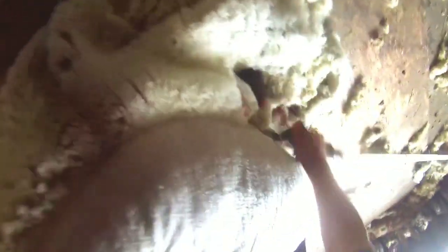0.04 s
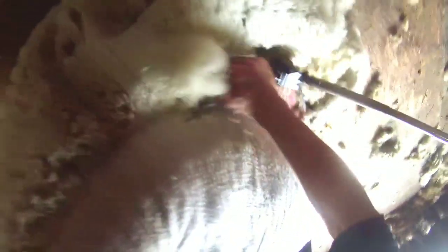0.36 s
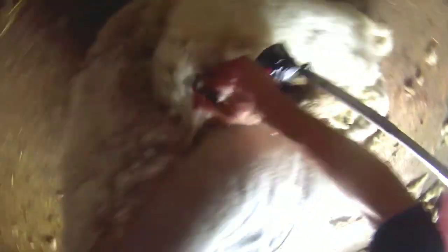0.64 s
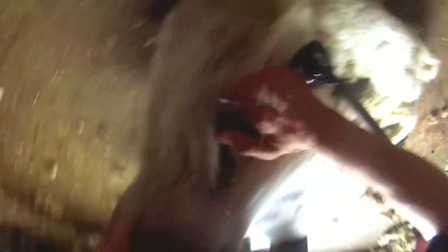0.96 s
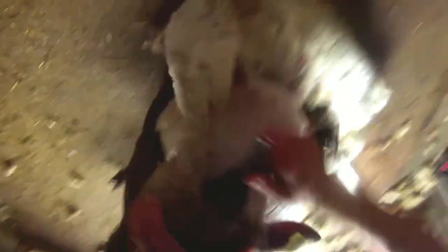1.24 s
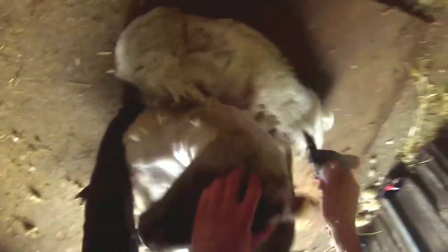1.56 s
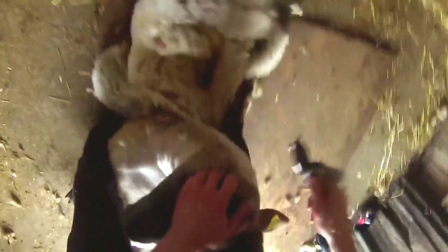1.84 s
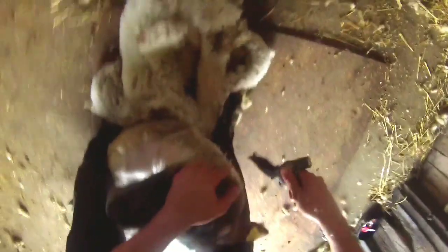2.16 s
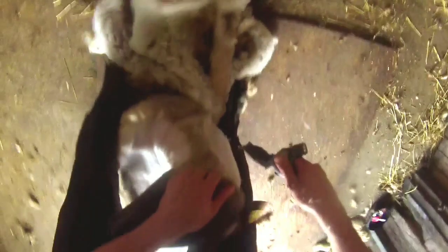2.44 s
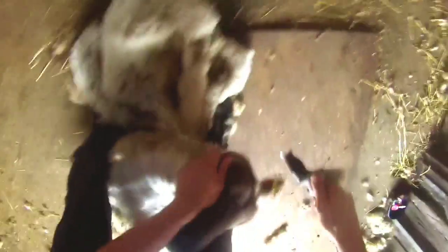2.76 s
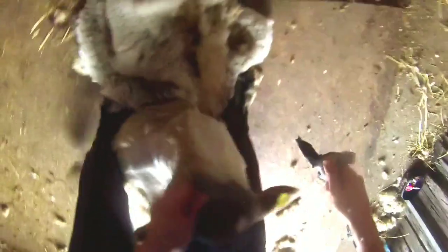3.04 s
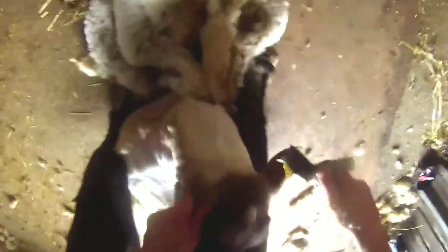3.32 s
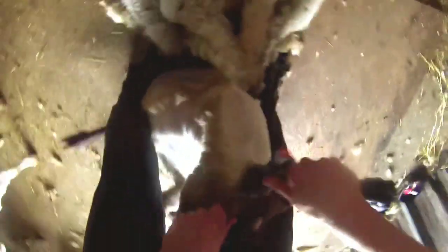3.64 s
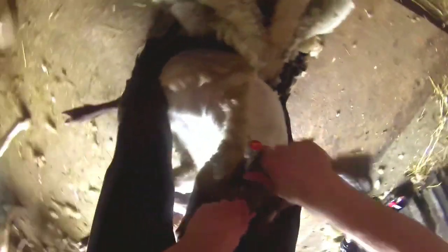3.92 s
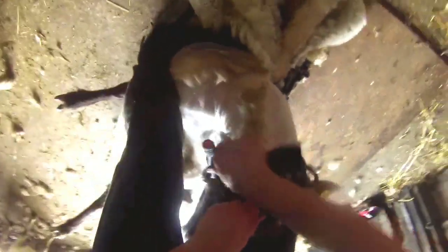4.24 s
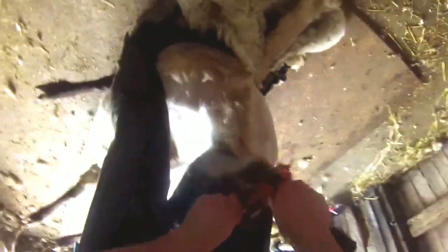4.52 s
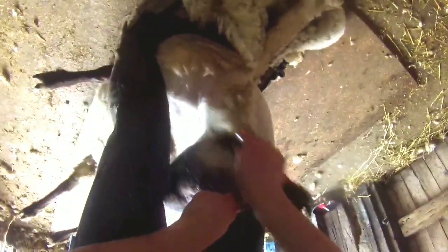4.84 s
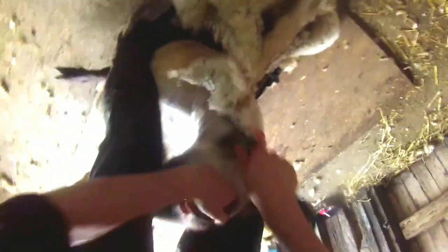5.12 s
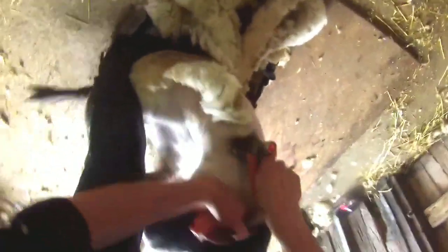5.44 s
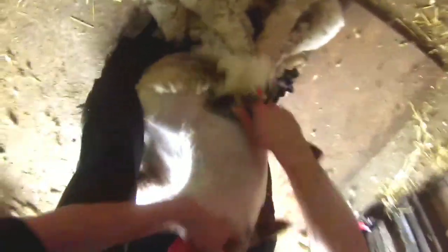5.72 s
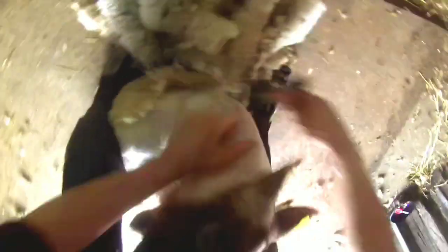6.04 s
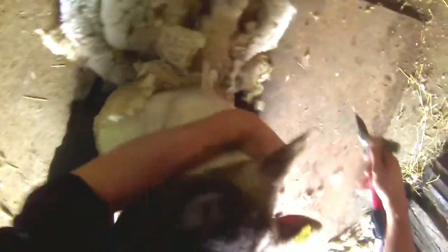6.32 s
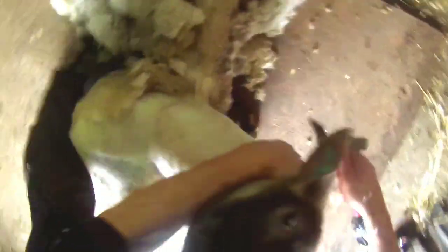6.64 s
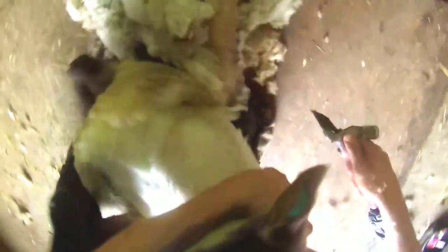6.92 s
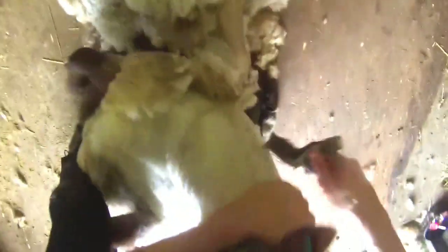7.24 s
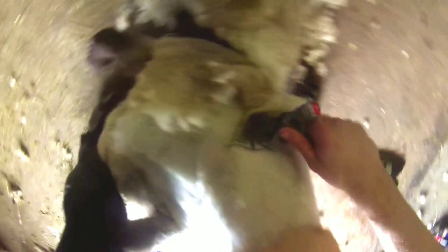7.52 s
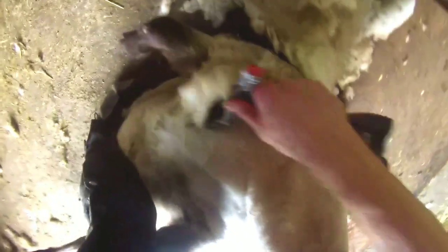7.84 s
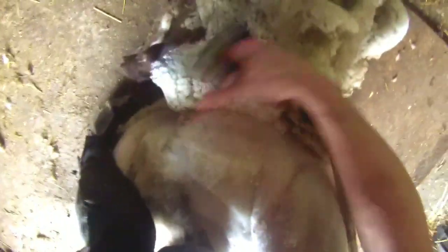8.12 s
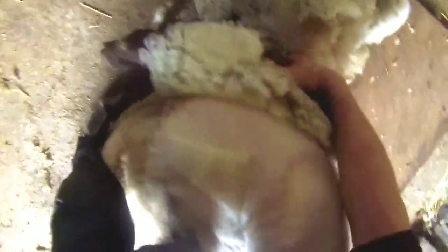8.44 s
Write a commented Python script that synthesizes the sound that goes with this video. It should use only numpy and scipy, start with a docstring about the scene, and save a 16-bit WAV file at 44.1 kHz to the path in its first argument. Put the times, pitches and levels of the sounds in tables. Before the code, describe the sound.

An electric shearing handpiece buzzes and rattles steadily through a sheep's fleece in a barn, with dull bumps on the microphone.

```python
"""A shaft-driven shearing handpiece buzzes through a sheep's fleece in a barn, about 58 strokes a second.
Fork knocks and cutter friction ring the steel, brighter or duller as it meets wool; the drive hums.
The shearer's movements rumble and bump on a body-worn microphone throughout.
Near 1 s an animal calls once, far off. At 2.3 s the sound cuts out for a moment.
Near 7 s the shaft sags and the gear whine peaks; from 7.5 s the shearer moves hardest."""
import sys
import numpy as np
from scipy import signal
from scipy.fft import rfft, irfft, next_fast_len
from scipy.io import wavfile
from scipy.ndimage import uniform_filter1d, map_coordinates

SR = 44100
rng = np.random.default_rng(int(sys.argv[2]) if len(sys.argv) > 2 else 0)


def generate_wav(signal):
    """Clip the signal to [-1, 1] and save it as 16-bit WAV at the path in sys.argv[1]."""
    frames = np.transpose(np.atleast_2d(signal))
    scaled = np.clip(frames, -1, 1) * 32767
    pcm = np.round(scaled).astype(np.int16)
    wavfile.write(sys.argv[1], SR, pcm)


N = 382347
TIME_S = np.arange(N) / SR


def amp(db):
    """Decibels to gain."""
    return 10 ** (np.asarray(db) / 20)


def unit(x):
    """Scale to rms 1."""
    return x / np.sqrt(np.mean(x ** 2) + 1e-20)


def along(points, hz):
    """(Hz, value) points read on a log axis."""
    point_hz, values = np.transpose(points)
    return np.interp(np.log(np.maximum(hz, 1)), np.log(point_hz), values)


def curve(points):
    """(seconds, value) points read at every sample."""
    return np.interp(TIME_S, *np.transpose(points))


def spells(rows, ramp_s):
    """(start s, end s, value, ..) rows as one curve per value column: rise, hold, fall."""
    rows = np.array(rows)
    gates = [np.clip(.5 + np.minimum(TIME_S - start_s, end_s - TIME_S) / ramp_s, 0, 1)
             for start_s, end_s in rows[:, :2]]
    return rows[:, 2:].T @ np.array(gates)


def wobble(knots_per_s, at_s=TIME_S):
    """Smooth random curve."""
    return map_coordinates(rng.standard_normal(512), [at_s * knots_per_s], mode="mirror")


def filtered(x, response):
    """x through a response given as a function of Hz."""
    size = next_fast_len(N + SR // 4, True)
    return irfft(rfft(x, size) * response(np.fft.rfftfreq(size, 1 / SR)), size)[:N]


def noise(spectrum):
    """Noise shaped by (Hz, dB) points, at rms 1."""
    return unit(filtered(rng.standard_normal(N), lambda hz: amp(along(spectrum, hz))))


def pulses(times_s, sizes):
    """Sharp impulses placed between samples."""
    taps = np.floor(times_s * SR)[:, None] + np.arange(-7, 9)
    offset = taps - times_s[:, None] * SR
    shapes = sizes[:, None] * np.sinc(offset) * np.cos(np.pi * offset / 16) ** 2
    return np.bincount(np.clip(taps, 0, N).astype(int).ravel(), shapes.ravel(), N + 1)[:N]


def wash():
    """Diffuse noise of the machine in the barn."""
    # Each row: frequency in Hz, relative density in dB.
    spectrum = [(200, -18), (500, 1), (900, 2), (2000, -0.5), (6000, -0.5), (10000, -8.5), (16000, -17)]
    return amp(-64) * noise(spectrum)


def barn(x, wet_db):
    """Floor and walls answer, treble dying first; the answer changes as the handpiece travels."""
    # Each row: frequency in Hz, t60 in seconds.
    decay = [(200, 0.38), (2000, 0.2), (12000, 0.063)]
    hz, t, bins = signal.stft(rng.standard_normal((2, SR // 3)), SR, nperseg=256)
    tails = signal.istft(bins * amp(-60 * t / along(decay, hz)[:, None]), SR, nperseg=256)[1]
    here, there = [signal.fftconvolve(x, tail / np.linalg.norm(tail))[:N] for tail in tails]
    travel_rad = 2 * np.pi * .6 * TIME_S
    return unit(x + amp(wet_db) * (np.cos(travel_rad) * here + np.sin(travel_rad) * there))


def far_animal(waver_db):
    """One call slides up, swells and fades; only harmonics near the throat's resonance carry."""
    # Each row: harmonic number, relative level in dB.
    throat = [(3, 2), (4, 18.5), (5, 2.5)]
    start_s, peak_s, end_s = .82, 1.056, 1.5
    from_hz, to_hz, glide_s = 173, 188, .088
    swell_db_per_s, fade_db_per_s = 29, 46
    pitch_hz = to_hz + (from_hz - to_hz) * np.exp(-np.maximum(TIME_S - start_s, 0) / glide_s)
    phase = 2 * np.pi * np.cumsum(pitch_hz) / SR
    voice = unit(sum(amp(db) * np.sin(harmonic * phase) for harmonic, db in throat))
    level_db = -59 - np.maximum(swell_db_per_s * (peak_s - TIME_S), fade_db_per_s * (TIME_S - peak_s))
    gate, = spells([(start_s, end_s, 1)], ramp_s=.04)
    return voice * gate * amp(level_db + waver_db * wobble(34.7))


def movement(gust_db, crunch_db):
    """Air buffets the microphone and clothing rubs beside it, both more when the shearer shifts."""
    # Each row: start in seconds, end in seconds, air boost in dB, rub boost in dB.
    moves = [(.5, 1.8, 6, 0.5), (1.3, 1.44, 1.5, 1.5), (2.1, 2.6, 6.5, 4.5), (4.45, 4.6, 3, 0.5),
             (4.65, 7.5, 2.5, 0), (5.3, 5.65, 7.5, 1), (7.53, 7.97, 10.5, 4), (8.03, 8.16, 15.5, 3),
             (8.23, 8.7, 10.5, 7.5), (8.5, 8.7, 1.5, 2)]
    # Each row: frequency in Hz, relative density in dB.
    air_spectrum = [(2, -25), (7, 4.5), (12, 3), (20, -5.5), (32, -13.5), (50, -21), (80, -31.5),
                    (140, -49.5), (400, -71), (1000, -120)]
    rub_spectrum = [(30, -39), (80, 3), (130, 2.5), (200, -0.5), (270, -1), (380, -4.5), (600, -10),
                    (1200, -12.5), (4000, -39.5)]
    air_db, rub_db = spells(moves, ramp_s=.06)
    unrest_db, folds_db = gust_db * wobble(5.9), crunch_db * wobble(45)
    air = amp(-45 + air_db + unrest_db) * noise(air_spectrum)
    rub = amp(-69.5 + rub_db + folds_db) * noise(rub_spectrum)
    return air + rub


def bumps(t60_s):
    """Each jolt of the microphone is a short, dull shudder."""
    # Each row: start in seconds, peak in dB before the common boost.
    jolts = [(0.524, -64), (0.601, -69), (0.812, -57.5), (1.209, -61), (1.406, -59), (1.662, -60),
             (1.792, -67), (2.186, -54.5), (5.474, -62), (5.585, -58), (5.609, -64), (5.835, -57),
             (7.579, -53.5), (7.648, -56), (7.769, -59.5), (8.104, -54.5), (8.27, -53), (8.431, -55.5),
             (8.57, -54)]
    # Each row: frequency in Hz, relative density in dB.
    spectrum = [(40, 4), (130, -8.5), (265, -0.5), (370, -14.5), (520, -19.5), (1200, -20), (4000, -52)]
    boost_db, attack_s = 10.5, .0004
    t, out = np.arange(SR // 5) / SR, np.zeros(N + SR)
    colour = amp(along(spectrum, np.fft.rfftfreq(len(t), 1 / SR)))
    envelope = amp(-60 * t / t60_s) * (1 - np.exp(-t / attack_s))
    for start_s, db in jolts:
        thud = irfft(rfft(rng.standard_normal(len(t))) * colour, len(t)) * envelope
        out[round(start_s * SR):][:len(t)] += amp(db + boost_db) * thud / np.abs(thud).max()
    return out[:N]


def shaft():
    """Turns made so far, plus a shudder of the joints that grows as the shaft is dragged slow."""
    # Each row: time in seconds, speed in turns a second.
    speeds = [(0, 58.1), (.43, 58.2), (.48, 57.6), (1.21, 58.3), (1.8, 58.1), (3.04, 57.5), (3.19, 58.0),
              (3.86, 57.6), (4.15, 58.2), (4.32, 57.7), (4.95, 58.2), (6.18, 58.3), (6.69, 57.6),
              (6.81, 56.5), (7.15, 57.15), (7.21, 57.85), (8.1, 58.15), (8.67, 57.7)]
    speed_hz, easy_hz = curve(speeds), 57.8
    shudder_turns = .0023 + .0114 * np.maximum(easy_hz - speed_hz, 0)
    coarse_s = np.linspace(0, N / SR, 2000)
    shake = np.interp(TIME_S, coarse_s, wobble(45, coarse_s))
    return np.cumsum(speed_hz) / SR + shudder_turns * shake


def drive(turns, waver_db):
    """The unbalanced shaft hums; its gears whine on higher orders that waver as the arm swings."""
    # Each row: start in seconds, end in seconds, boost in dB.
    hum_swells = [(2.35, 3.13, 9.5), (3.35, 3.64, 8.5), (7.56, 8.24, 14.5)]
    # Each row: shaft order, relative level in dB.
    gears = [(11, -11), (12, -15), (13, -2.5), (14, 0), (15, -9), (16, -1), (17, -8), (18, -4), (19, -11),
             (20, -13), (21, -9)]
    # Each row: time in seconds, level in dB.
    whine_levels = [(0, -71), (2, -73.5), (3.3, -75.5), (4.1, -73), (6.5, -70.3), (7.2, -65.5),
                    (8.67, -71.5)]
    hum_db = -66.5 + spells(hum_swells, ramp_s=.055)[0]
    coarse_s, whine = np.linspace(0, N / SR, 200), np.zeros(N)
    for order, db in gears:
        sway_db = waver_db * np.interp(TIME_S, coarse_s, wobble(2.344, coarse_s))
        whine += amp(db + sway_db) * np.sin(2 * np.pi * (order * turns + rng.random()))
    return amp(hum_db) * unit(np.sin(2 * np.pi * turns)) + amp(curve(whine_levels)) * unit(whine)


def clatter(turns, drift_turns, jitter_s, scatter_db, sway_db):
    """The loose fork knocks several times a turn; each knock shifts and swells with the grip."""
    # Each row: place as a share of the turn, relative level in dB.
    contacts = [(.04, -5.5), (0.151, -10), (.29, -5), (0.432, -3.5), (0.551, -16.5), (0.682, -12.5),
                (0.829, -13)]
    whole_turns, knocks = np.arange(int(turns[-1]) - 1), np.zeros(N)
    starts_s = np.interp(whole_turns, turns, TIME_S)
    for place, db in contacts:
        jitter, scatter = rng.standard_normal((600, 2))[:len(whole_turns)].T
        at_turns = whole_turns + place + drift_turns * wobble(2.5, starts_s)
        times_s = np.interp(at_turns, turns, TIME_S) + jitter_s * jitter
        knocks += pulses(times_s, amp(db + sway_db * wobble(4, starts_s) + scatter_db * scatter))
    return unit(knocks)


def scrape(turns, stroke_bite, tooth_bite, lean, grit_db):
    """Strength of gritty friction: it jumps and fades at each cutter reversal and each tooth crossed."""
    def bursts(per_turn):
        return np.exp(-4 * (per_turn * turns % 1))
    reversals = stroke_bite * bursts(per_turn=2) * (1 + lean * np.cos(2 * np.pi * turns))
    crossings = tooth_bite * bursts(per_turn=8)
    grains = np.arange(0, N, 32)
    grit = np.interp(np.arange(N), grains, rng.standard_normal(len(grains)))
    return unit((1 + reversals + crossings) * amp(grit_db * grit))


def resonate(x, modes):
    """x through steep-sided resonances that hand and wool keep well damped, at rms 1."""
    def response(hz):
        power = 0
        for centre_hz, min_width_hz, db in modes:
            damping = (hz + 1) * max(min_width_hz, centre_hz / 9)
            detune = centre_hz ** 2 - hz ** 2
            power += (amp(db) * damping ** 2 / (detune ** 2 + damping ** 2)) ** 2
        lag = (damping + 1j * detune) / (damping - 1j * detune)  # all-pass at the last mode
        return np.sqrt(power) * lag
    return unit(filtered(x, response))


def zings(force):
    """Single resonances of the steel briefly come free and ring out."""
    # Each row: start in seconds, end in seconds, pitch in Hz, level in dB.
    rings = [(0.774, .87, 1630, -56), (1.563, 1.847, 1613, -59.5), (2.754, 2.928, 1640, -55.5),
             (2.77, 2.92, 2320, -56), (3.14, 3.62, 3190, -53.5), (3.907, 3.993, 1630, -54),
             (4.5, 4.68, 1680, -60.5), (5.706, 5.844, 6930, -56), (6.227, 6.536, 4270, -67),
             (6.6, 6.803, 1680, -56.5), (6.96, 7.04, 3500, -57), (7.07, 7.15, 980, -64),
             (7.495, 7.753, 2186, -54)]
    min_width_hz, out = 140, np.zeros(N)
    for start_s, end_s, hz, db in rings:
        gate, = spells([(start_s, end_s, 1)], ramp_s=.043)
        out += amp(db) * gate * resonate(force, [(hz, min_width_hz, 0)])
    return out


def ring_levels(flicker_db):
    """dB of housing, fork, comb, cutter, teeth, tips: load swells heavy parts, rubbing thin ones."""
    # Each row: time in seconds, level in dB.
    fork_levels = [(0, -50.5), (.35, -55.5), (1.1, -48.5), (2.0, -50), (2.65, -53.5), (3.15, -50.5),
                   (3.65, -54), (4.15, -49.5), (4.45, -55.5), (5.9, -52), (6.1, -55.5), (6.7, -51),
                   (7.15, -56), (8.67, -56)]
    comb_levels = [(0, -55), (.5, -57), (1.3, -56.3), (2.5, -53), (2.95, -56), (3.25, -55), (4.1, -53.5),
                   (4.65, -58), (4.9, -54), (5.3, -56.5), (6.2, -54), (6.42, -52), (7.0, -55.5),
                   (7.08, -61), (8.67, -63.5)]
    # Each row: start and end in seconds, then housing and fork gain in dB.
    loads = [(.52, 1.9, 3.5, -1), (1.36, 1.53, 4.5, -3), (2.05, 2.3, 6, 0), (3.8, 4.03, -1, 2),
             (3.91, 4.25, 2.5, -0.5), (4.53, 6.0, 2.5, 0.5), (6.25, 6.42, 4, -2), (6.6, 7.15, 1.4, -2),
             (7.5, 7.76, 3, -0.5), (8.08, 8.6, 3.5, 1)]
    # Each row: start and end in seconds, then cutter, teeth and tips gain in dB.
    sizzles = [(-.1, .2, 1, 3, 2.5), (.2, .5, 1, 3.5, 0), (1.3, 1.92, 2, 2.5, -0.5),
               (1.93, 2.14, 4.5, 3, 1.5), (3.66, 3.87, 1, -3, 3.5), (4.25, 4.7, 0.7, 0.5, 2.5),
               (4.82, 6.02, 1.5, 4.5, 0.2), (6.13, 7.04, 1, 4, 3.5), (6.8, 6.96, 4, 0, 0.5),
               (6.96, 7.03, 3, 3.5, 2.5), (7.12, 7.86, 2, .8, 1.3), (7.9, 8.2, 0, -3, 1.5),
               (8.42, 8.7, -1.5, -1.5, 0)]
    housing_load_db, fork_load_db = spells(loads, ramp_s=.071)
    cutter_rub_db, teeth_rub_db, tips_rub_db = spells(sizzles, ramp_s=.044)
    comb_db = curve(comb_levels)  # wool frees or damps the comb
    follow_db = .12 * (comb_db - comb_db.mean())
    grip_db = flicker_db * wobble(15)  # the hand damps the housing unevenly
    return (-59 + housing_load_db + grip_db, curve(fork_levels) + fork_load_db, comb_db,
            -59 + cutter_rub_db, -62 + follow_db + teeth_rub_db, -59.5 + tips_rub_db)


def tips_hiss(lower_force, upper_force, top_force):
    """The tooth tips hiss, crossfading between a lower and an upper ring, with fainter modes on top."""
    # Each row: centre in Hz, minimum width in Hz, relative level in dB.
    edge_modes = [(7800, 1500, 0), (9100, 1600, 0)]
    top_modes = [(11000, 3400, -1), (14600, 4500, -8.5)]
    # Each row: time in seconds, centre of the crossfade in Hz.
    centres = [(0, 7980), (3.5, 8000), (3.75, 8160), (4.1, 7970), (5.9, 7950), (6.5, 7960), (7.0, 7920),
               (7.45, 7630), (7.9, 8680), (8.67, 9000)]
    lower, upper = edge_modes
    upper_share = np.clip((curve(centres) - lower[0]) / (upper[0] - lower[0]), 0, 1)
    edge = np.sqrt(1 - upper_share) * resonate(lower_force, [lower])
    edge += np.sqrt(upper_share) * resonate(upper_force, [upper])
    return unit(unit(edge) + amp(-9.5) * resonate(top_force, top_modes))


def shifting_touch(x, patchy_db):
    """Hand and wool touch the thin steel in ever new places, so its treble changes colour in patches."""
    hz, _, bins = signal.stft(x, SR, nperseg=512)
    patches = rng.standard_normal(bins.shape)
    for size, axis in [(5, 0), (4, 0), (40, 1), (26, 1)]:  # smooth over frequency, then time
        patches = uniform_filter1d(patches, size, axis)
    depth_db = patchy_db * along([(1800, .3), (4500, 1)], hz)[:, None]
    return signal.istft(bins * unit(amp(depth_db * unit(patches))), nperseg=512)[1][:N]


def handpiece(turns):
    """Knocks and scraping ring the steel; the fork mostly knocks, housing and comb rasp more,
    cutter, teeth and tips mostly hiss."""
    # Each row: centre in Hz, minimum width in Hz, relative level in dB.
    housing_modes = [(1536, 195, 3.5), (1610, 105, 1)]
    fork_modes = [(2209, 338, 0), (2435, 460, -3.5)]
    comb_modes = [(2750, 420, -3), (3360, 520, -1), (3770, 430, -5), (4380, 490, -.5)]
    cutter_modes = [(4880, 560, -1.5), (5360, 600, 0)]
    teeth_modes = [(6800, 900, 0), (6200, 700, -11)]
    housing_db, fork_db, comb_db, cutter_db, teeth_db, tips_db = ring_levels(flicker_db=1.1)
    knocks = clatter(turns, drift_turns=.018, jitter_s=.00002, scatter_db=1.8, sway_db=1.2)
    knocks = barn(knocks, wet_db=-1.5)
    friction = scrape(turns, stroke_bite=.42, tooth_bite=.72, lean=.31, grit_db=2)
    knocking_db, rasping_db, hissing_db = -2, 2, 7  # friction over knocks

    def force(friction_db):
        return knocks + amp(friction_db) * friction * rng.standard_normal(N)
    tips = tips_hiss(force(hissing_db), force(hissing_db), force(hissing_db))
    return (zings(force(knocking_db))
            + amp(housing_db) * resonate(force(rasping_db), housing_modes)
            + amp(fork_db) * resonate(force(knocking_db), fork_modes)
            + amp(comb_db) * resonate(force(rasping_db), comb_modes)
            + amp(cutter_db) * resonate(force(hissing_db), cutter_modes)
            + amp(teeth_db) * resonate(force(hissing_db), teeth_modes)
            + amp(tips_db) * tips)


def scene():
    """One shaft turns drive and cutter; the shearer moves and an animal calls. Mono."""
    turns = shaft()
    machine = wash() + shifting_touch(handpiece(turns), patchy_db=1.5) + drive(turns, waver_db=3.5)
    shearer = movement(gust_db=1, crunch_db=2) + bumps(t60_s=.14)
    return (machine + shearer + far_animal(waver_db=1.5))[None]


def record(dry):
    """One dropout, then a hard band limit."""
    gap_start_s, gap_end_s, top_hz = 2.2968, 2.4362, 15750
    running = (TIME_S < gap_start_s) | (TIME_S > gap_end_s)
    return filtered(dry[0] * running, lambda hz: hz < top_hz)[None]


dry = scene()
out = record(dry)
generate_wav(out)
```